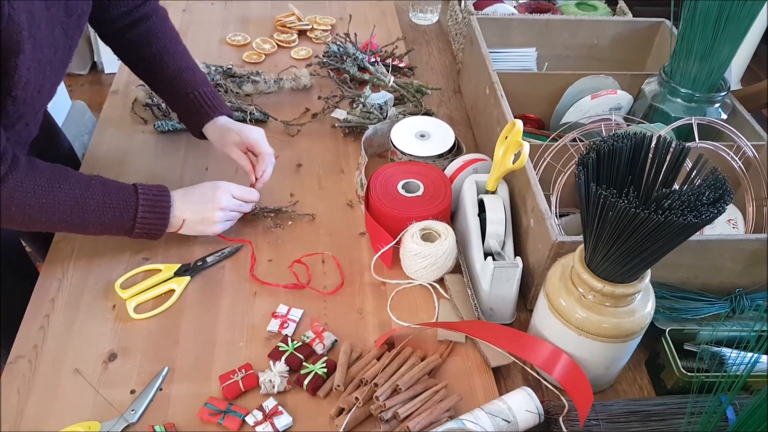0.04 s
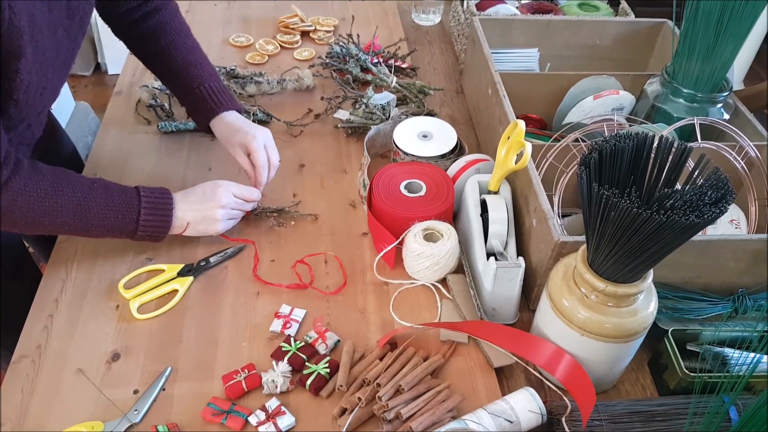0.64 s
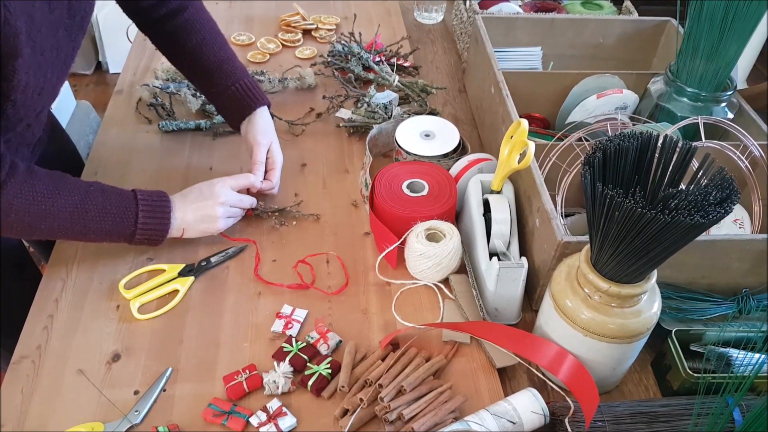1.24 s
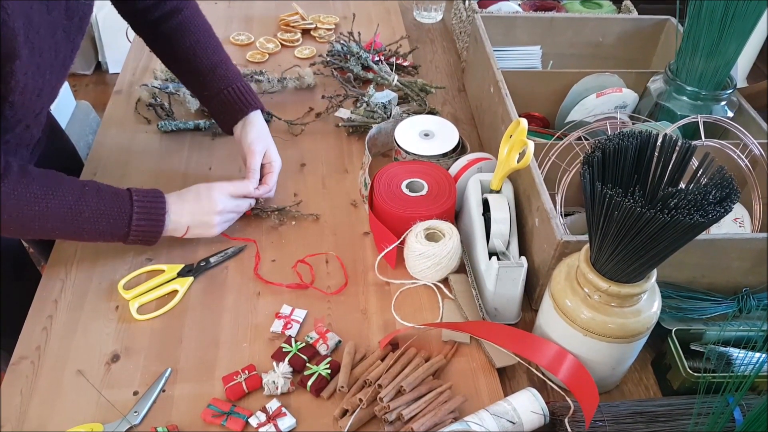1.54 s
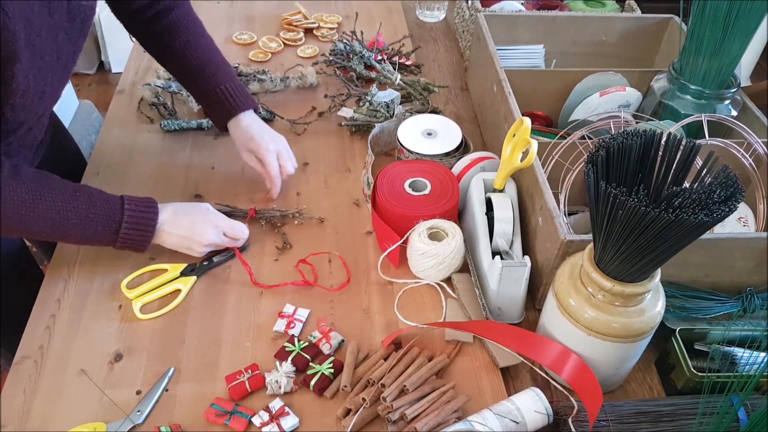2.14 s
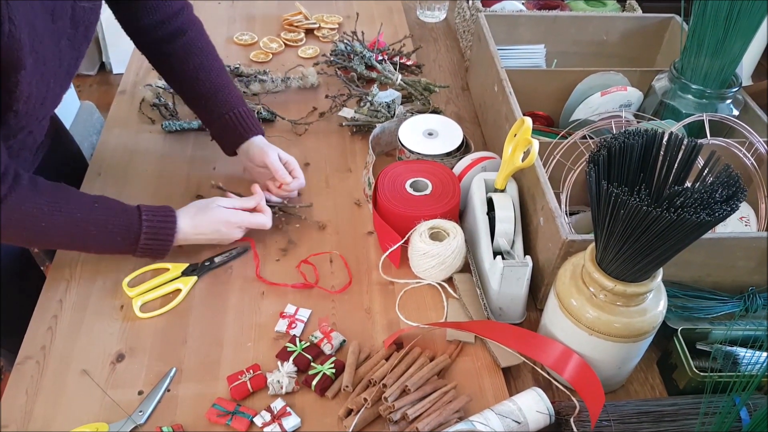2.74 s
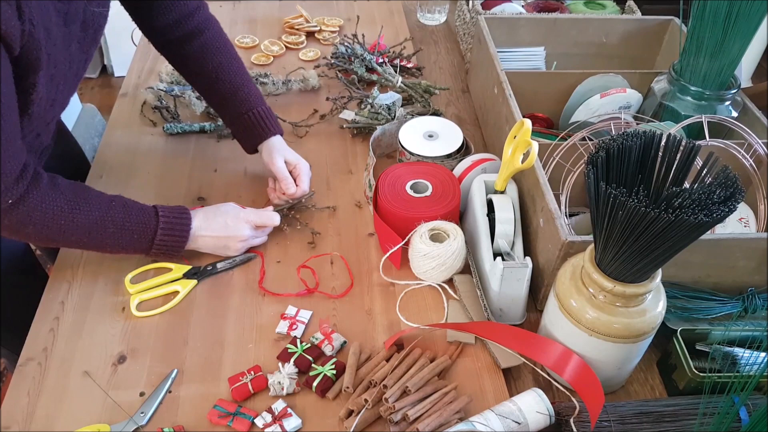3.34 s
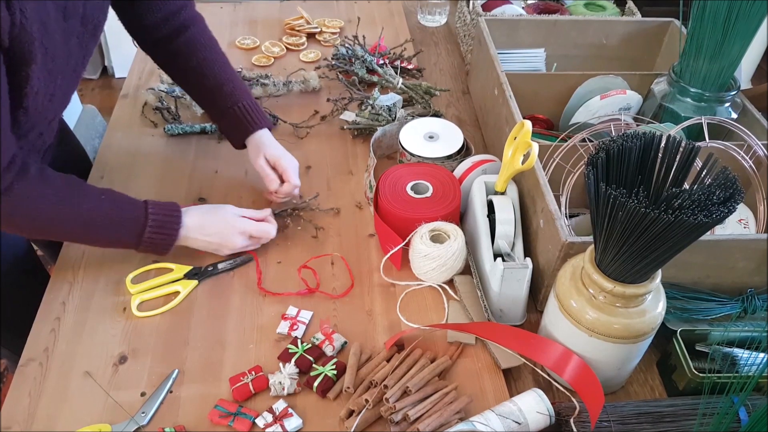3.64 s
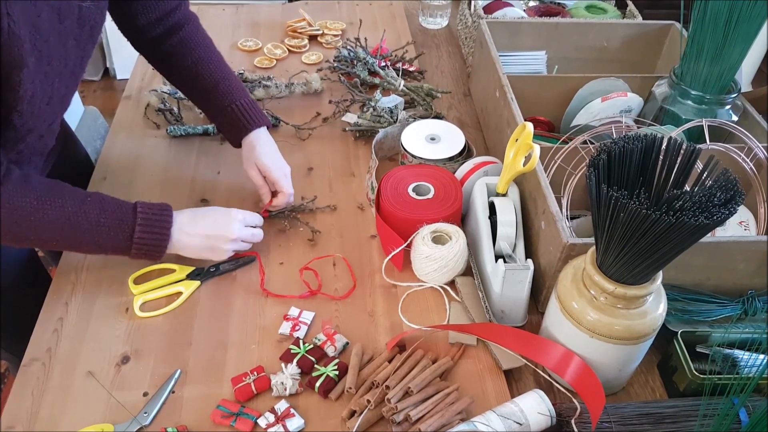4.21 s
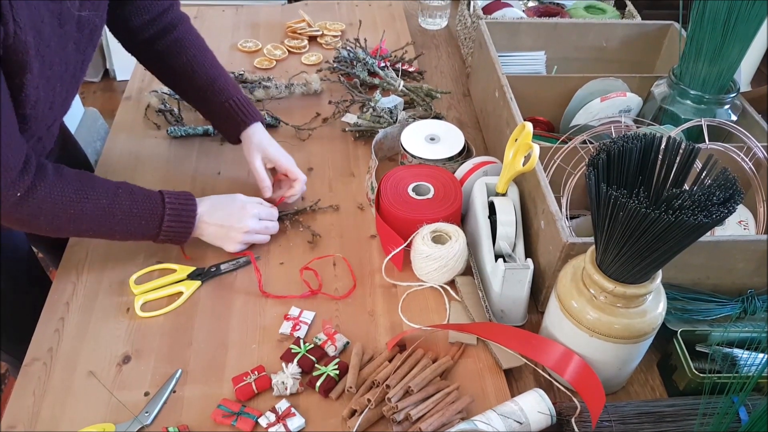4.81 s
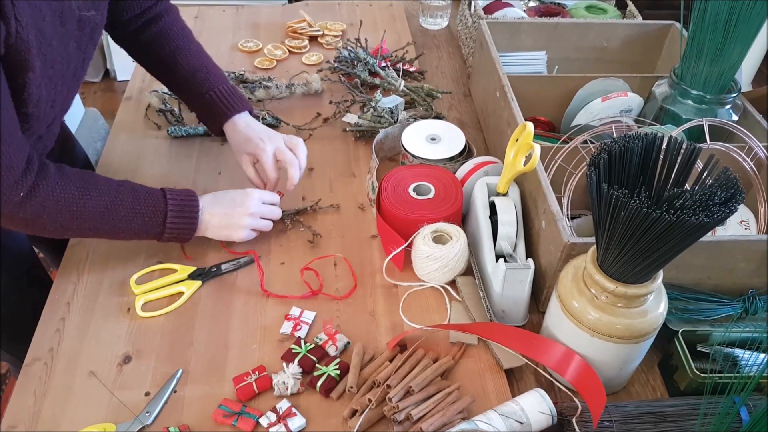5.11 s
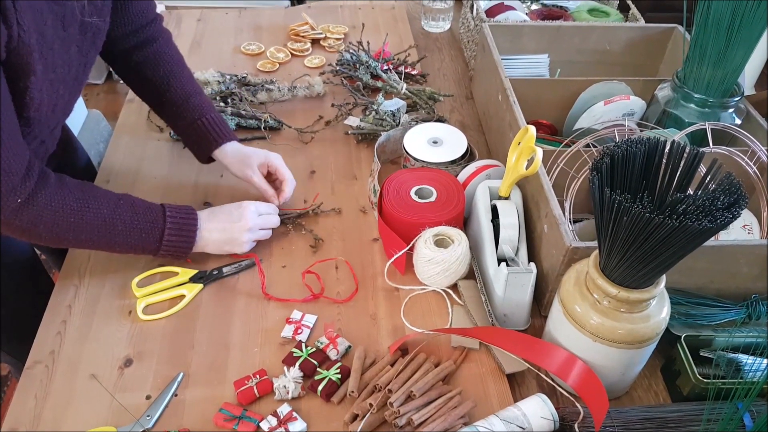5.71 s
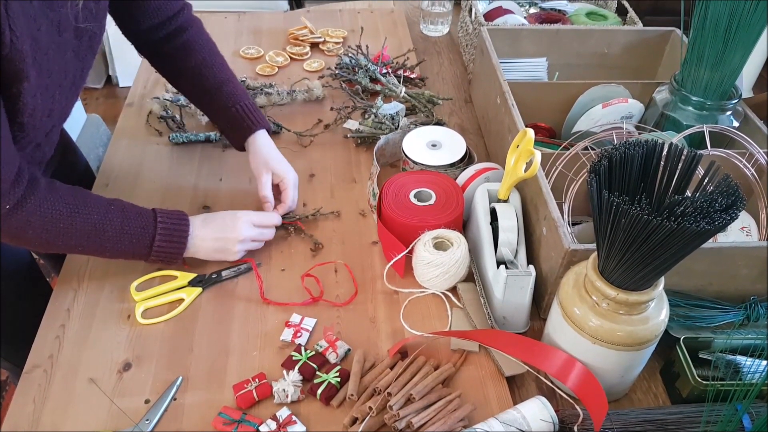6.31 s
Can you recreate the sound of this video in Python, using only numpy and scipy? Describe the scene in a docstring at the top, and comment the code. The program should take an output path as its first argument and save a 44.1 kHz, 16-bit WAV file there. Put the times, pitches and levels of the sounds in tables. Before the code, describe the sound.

In a quiet workroom, hands wind raffia around a bunch of dry twigs, making faint rustles and small, crisp crackles. A little before halfway, something hard is set down on wood a short way off, with a much louder double knock and a brief clatter. Light taps, soft thuds and faint scrapes follow while the twigs crackle on sparsely. The microphone is near the hands, with a low hiss behind.

```python
"""Hands wind wired raffia round a bunch of dry twigs at a wooden table in a quiet workroom. Friction makes the
fibres rustle, and small brittle fractures make the twigs crackle, and now and then a twig taps the table. A
little way off something hard is set down with a double knock that excites the modes of the wood, then shifted
about with light taps and stick-slip scrapes. Underneath lie a far, sinking drone, two soft, low swells of
rumble, a few soft thuds, the murmur of the building and a steady hiss."""
import sys
import numpy as np
from scipy import signal
from scipy.fft import rfft, irfft, next_fast_len
from scipy.io import wavfile
from scipy.ndimage import uniform_filter1d

SR = 44100
rng = np.random.default_rng(int(sys.argv[2]) if len(sys.argv) > 2 else 0)


def transcribe(signal):
    """Save signal, clipped to [-1, 1], as a 16-bit WAV file at the path in sys.argv[1]."""
    frames = np.atleast_2d(signal).T
    limited = np.clip(frames, -1, 1)
    pcm = np.round(limited * 32767).astype(np.int16)
    wavfile.write(sys.argv[1], SR, pcm)


N = 289472
TIME = np.arange(N) / SR


def gain_of(db):
    """Amplitude grows tenfold with every 20 dB."""
    return np.exp(np.asarray(db) * (np.log(10) / 20))


def unit_rms(x):
    """Dividing by the rms gives a signal unit power."""
    return x / np.sqrt(np.mean(x ** 2) + 1e-20)


def read(points, hz):
    """Interpolation of a spectrum on a logarithmic frequency axis."""
    known_hz, value = np.transpose(points)
    return np.interp(np.log(hz + 1), np.log(known_hz + 1), value)


def add(mix, start_s, sound):
    """Superposition: a sound adds linearly to the mix from its start time."""
    part = mix[..., max(round(start_s * SR), 0):][..., :sound.shape[-1]]
    part += sound[..., :part.shape[-1]]


def convolve(x, response):
    """A linear system convolves each channel with its impulse response."""
    return signal.fftconvolve(np.atleast_2d(x), np.atleast_2d(response), axes=1)[:, :N]


def minimum_phase(spectrum):
    """Minimum phase gives the most compact response with this spectrum, here of unit energy."""
    log_gain = np.log(gain_of(read(spectrum, abs(np.fft.fftfreq(4096, 1 / SR)))))
    response = np.fft.ifft(np.exp(signal.hilbert(log_gain).conj())).real[:2048]
    return response / np.linalg.norm(response)


def gestures(rows, rise_s, fall_s):
    """An envelope for rows of start, length and dB: linear attack, hold, then exponential decay."""
    envelope = np.zeros(N)
    for start, length, db in rows:
        t = TIME[:round((length + 10 * fall_s) * SR)]
        decay = np.exp(-np.maximum(t - length, 0) / fall_s)
        add(envelope, start, gain_of(db) * np.minimum(t / rise_s, 1) * decay)
    return envelope


def diffuse_noise(samples):
    """A diffuse field is coherent at two microphones in the bass and independent in the treble."""
    # Likeness of the two channels. Each row: frequency in Hz, coherence from 0 to 1.
    coherence = [(30, .7), (70, .68), (150, .92), (300, .8), (500, .68), (800, .3), (1500, .02),
                 (16000, .02)]
    size = next_fast_len(samples, True)
    spectra = rfft(rng.standard_normal((2, samples)), size)
    alike = read(coherence, np.fft.rfftfreq(size, 1 / SR))
    mid = spectra[0] * np.sqrt((1 + alike) / 2)
    side = spectra[1] * np.sqrt((1 - alike) / 2)
    return irfft(np.array([mid + side, mid - side]), size)[:, :samples]


def coloured_noise(spectrum):
    """Diffuse white noise takes on the spectrum of its filter; the result has unit power."""
    return unit_rms(convolve(diffuse_noise(N), minimum_phase(spectrum)))


def room(x, clutter_db, tail_db, clutter_t60=.1, onset_s=.0014):
    """Reverberation: quick scattering from things on the table, and the room's exponential tail."""
    # Decay of the room. Each row: frequency in Hz, t60 in seconds.
    decay_times = [(130, 0.44), (550, 0.58), (1200, 0.6), (2500, 0.58), (5000, 0.9), (12000, 0.06)]
    # Spectrum of the tail. Each row: frequency in Hz, level in dB.
    colour = [(130, 2), (400, 6), (800, .8), (1300, -3.6), (2000, -2), (3200, -8.5), (5000, -10.5),
              (14000, -12)]
    hz, t, bands = signal.stft(diffuse_noise(SR), SR, nperseg=256)
    bands *= gain_of(read(colour, hz)[:, None] - 60 * t / read(decay_times, hz)[:, None])
    tail = signal.istft(bands, SR, nperseg=256)[1][:, :SR]
    clutter = diffuse_noise(SR) * gain_of(-60 * TIME[:SR] / clutter_t60)
    swell = np.minimum(TIME[:SR] / onset_s, 1) ** 2
    return convolve(x, swell * (gain_of(clutter_db) * clutter + gain_of(tail_db) * tail))


def hiss(level_db=-69.5):
    """Stationary broadband noise comes from the room and the microphones."""
    # Spectrum of the hiss. Each row: frequency in Hz, relative density in dB.
    colour = [(20, 0), (55, -4), (80, -6.5), (115, -4.5), (200, -9), (350, -8.5), (1000, -11.5),
              (2000, -13), (3000, -16.5), (5000, -20.5), (7800, -24), (10000, -25.5), (13000, -19),
              (15800, -22)]
    return gain_of(level_db) * coloured_noise(colour)


def murmur():
    """The building's murmur is low-frequency noise under slow amplitude modulation."""
    # Spectrum of the murmur. Each row: frequency in Hz, relative density in dB.
    colour = [(25, -13.5), (80, -3.5), (125, 0), (190, -6), (300, -7), (600, -14.5), (1600, -17.5),
              (3000, -21.5), (6000, -37), (16000, -44)]
    # Its rise and fall. Each row: time in seconds, level in dB.
    contour = [(0, -67), (.45, -71.5), (.7, -71.5), (1.6, -69.5), (1.9, -66), (2.5, -71.5), (4.0, -71.5),
               (4.5, -76), (6.56, -73)]
    times, db = np.transpose(contour)
    return gain_of(np.interp(TIME, times, db) - .3) * coloured_noise(colour)


def drone(start_hz=60.2, sag_hz_per_s=2.1, lowest_hz=56.3, drift=.012, waver_db=3, rest_db=-95.5):
    """A far drone is a harmonic series on a wavering fundamental that sinks, then settles."""
    # Its swells. Each row: start and length in seconds, fundamental level in dB, overtone level in dB.
    swells = [(-.05, 0.52, -73, -68.5), (0.598, 0.56, -71, -77), (1.8, .2, -75, -82), (2.05, .55, -71, -84),
              (2.7, .55, -76, -87)]
    # Relative levels of the harmonics in dB, from the second upward.
    overtones_db = [-1, -5, -14, -23, -20]
    knots = np.linspace(0, TIME[-1], num=90)
    draws = rng.standard_normal((2 + len(overtones_db), len(knots)))
    waver, wander, *flutters = (np.interp(TIME, knots, row) for row in draws)
    hz = np.maximum(start_hz - sag_hz_per_s * TIME, lowest_hz) * (1 + drift * wander)
    phase = 2 * np.pi * np.cumsum(hz) / SR
    fundamental = gain_of(waver_db * waver) * unit_rms(np.sin(phase))
    overtones = sum(gain_of(db + waver_db * flutter) * np.sin(k * phase)
                    for k, (db, flutter) in enumerate(zip(overtones_db, flutters), 2))
    rest, rise_s, fall_s = gain_of(rest_db), .081, .14
    deep = rest + gestures([(s, length, db) for s, length, db, _ in swells], rise_s, fall_s)
    upper = rest + gestures([(s, length, db) for s, length, _, db in swells], rise_s, fall_s)
    return deep * fundamental + upper * unit_rms(overtones)


def grains(per_s, spread_db=3):
    """Shot noise: tiny impulses of very unequal size arrive at random."""
    size = gain_of(spread_db * np.minimum(rng.exponential(1, N), 4))
    return unit_rms(size * rng.choice([-1, 1], N) * (rng.random(N) < per_s / SR))


def rustle(holding_db=-84.5, clump_db=3):
    """Friction of raffia on twigs sheds fine clicks, in clumps as it catches and lets go."""
    # Pulls of the raffia. Each row: start in seconds, length in seconds, level in dB.
    pulls = [(0.144, 0.036, -75.5), (0.342, 0.027, -73.5), (.98, 0.093, -71), (1.135, 0.065, -73),
             (1.342, 0.055, -71), (1.788, .1, -66), (1.915, .04, -71.5), (1.995, 0.11, -70),
             (2.24, .14, -80), (2.529, 0.44, -76), (2.985, 0.086, -71.5), (3.716, 0.092, -71),
             (3.961, 0.11, -80), (4.275, 0.031, -70), (4.86, 0.25, -79.5), (5.16, 0.061, -75.5),
             (5.507, 0.028, -76), (6.17, 0.047, -77.5)]
    fibres = np.array([grains(per_s=6000), grains(per_s=6000)])
    catching = gain_of(clump_db * unit_rms(uniform_filter1d(rng.standard_normal(N), size=150)))
    rubbing = gain_of(holding_db) + gestures(pulls, rise_s=.02, fall_s=.035)
    return rubbing * catching * fibres


def crackle(decay_s, body_db, swell_s=.0018, snap_s=.0011, body_hz=2500, crisp_hz=4200):
    """A crackle is a transient: faint clicks swell briefly into a snap, 10 ms in, then die away."""
    t = TIME[:SR // 16] - .01
    shape = (2, len(t))
    clicks = rng.standard_normal(shape) * (rng.random(shape) < 7000 / SR)  # 7000 a second
    clicks *= gain_of(-12) * np.exp(-abs(t) / np.where(t < 0, swell_s, decay_s))
    snap = rng.standard_normal(shape) * (t >= 0) * np.exp(-abs(t) / snap_s)
    snap /= np.linalg.norm(snap, axis=1, keepdims=True)
    # thick twigs add body, fine fibres only crisp treble
    return convolve(snap + clicks, minimum_phase([(body_hz, body_db), (crisp_hz, 0)]))


def twigs(stray_count=24, stray_db=-53.5, stray_spread_db=3, right_db=2):
    """Source and filter: rustle, loud crackles and faint chance ones share the colour of the twigs."""
    # The louder crackles. Each row: time in seconds, level in dB, decay time of the splintering
    # in seconds, woody body in dB.
    crackles = [(0.095, -42, .002, -3), (0.9225, -45, .012, -6), (0.9875, -34.5, .004, -3),
                (1.0545, -39, .005, 5), (1.1205, -49, .001, -3), (1.1428, -33.5, .005, 3),
                (1.1558, -36.5, .003, -3), (1.1605, -34, .01, -4), (1.2555, -48, .001, -8),
                (1.3588, -37, .002, -10), (1.3646, -35.5, .003, -7), (1.3712, -30.5, .003, -5),
                (1.385, -45, .008, 0), (1.572, -48, .002, -4), (1.640, -45, .002, -5),
                (1.701, -48, .004, -5), (1.7865, -48, .001, -6), (1.799, -46, .008, -8),
                (1.8105, -42.5, .002, 0), (2.0125, -45, .002, -8), (2.0232, -42.5, .002, -4),
                (2.0515, -42, .003, -5), (2.083, -48, .002, 0), (2.1015, -43.5, .002, -9),
                (2.1195, -46, .002, 8), (2.244, -49, .001, -6), (2.562, -40.5, .0014, -4),
                (2.9803, -42, .006, -5), (3.462, -42, .0015, 0), (3.9053, -40, .001, -4),
                (4.2125, -44, .007, -6), (4.3252, -44, .001, -8), (4.3696, -38.5, .002, -8),
                (4.392, -42, .003, -7), (4.8782, -38, .005, -2), (4.9706, -42.5, .002, -4),
                (4.982, -45, .002, -5), (5.855, -47, .004, -3)]
    # Spectrum of the twigs. Each row: frequency in Hz, relative gain in dB.
    colour = [(100, -17.5), (500, 3.5), (1500, 1.5), (3000, 0), (5000, -2), (6500, 0.5), (7900, 3),
              (9700, -2), (12000, 1), (16000, 0.5)]
    source = rustle()
    strays = [(when * TIME[-1], stray_db + stray_spread_db * (2 * size - 1), .0024, -3)
              for when, size in rng.random((stray_count, 2))]
    for s, db, decay_s, body_db in crackles + strays:
        add(source, s - .01, gain_of(db) * crackle(decay_s, body_db))
    direct = gain_of(-.8) * convolve(source, minimum_phase(colour))
    return direct * gain_of([[0], [right_db]]) + room(direct, clutter_db=-33, tail_db=-35.5)


def low_swells():
    """Amplitude-modulated noise makes two soft, low swells of rumble over the far drone."""
    # The swells. Each row: start in seconds, length in seconds, level in dB.
    swells = [(.27, .075, -69), (.42, .08, -71.5)]
    # Their spectrum. Each row: frequency in Hz, relative density in dB.
    colour = [(50, -25), (115, -0.5), (200, -2), (380, -5.5), (700, -22), (2000, -19), (8000, -47)]
    return gestures(swells, rise_s=.027, fall_s=.14) * coloured_noise(colour)


def ring(modes):
    """A struck body vibrates in damped modes, one a row; neighbours start in opposite phase."""
    hz, db, t60 = np.transpose(modes)[:, :, None]
    t = TIME[:SR // 5]
    sign = (-1) ** np.arange(len(modes))[:, None]
    return sign * gain_of(db - 60 * t / t60) * np.cos(2 * np.pi * hz * t)


def soften(x, cutoff_hz):
    """A contact of finite duration acts as a low-pass filter; the result has peak 1."""
    softened = signal.sosfilt(signal.butter(4, cutoff_hz, fs=SR, output="sos"), x)
    return softened / abs(softened).max()


def thuds():
    """Soft blows excite only low modes, which linger as reverberation."""
    # The blows. Each row: start in seconds, level in dB, weight of the lowest mode in dB.
    blows = [(1.3044, -53.5, -0.5), (1.887, -56.5, -10), (1.922, -59, -10), (2.789, -41, 2),
             (2.868, -51, 0), (3.044, -59, -8), (4.866, -55, -14), (5.0537, -44, 4.5), (6.43, -52.5, -12)]
    # Modes of a thud. Each row: frequency in Hz, level in dB, t60 in seconds.
    low_modes = [(138, -8, 0.17), (188, -13, 0.14), (249.7, -1.5, 0.07), (306, -3.5, 0.055),
                 (550, -9, 0.078)]
    direct, modes = np.zeros(N), ring(low_modes)
    for s, db, weight_db in blows:
        boom = gain_of(weight_db) * modes[0] + modes[1:].sum(0)
        add(direct, s, gain_of(db) * soften(boom, cutoff_hz=480))
    return gain_of(2) * direct + room(direct, clutter_db=-35, tail_db=-40.5)


def right_path(x, turn_hz=2080, width_hz=900):
    """The path round to the right microphone is an all-pass turn of phase with a treble lift."""
    # The lift. Each row: frequency in Hz, relative gain in dB.
    colour = [(300, 0), (1200, 1), (2200, 2.5), (4000, 3)]
    band = signal.lfilter(*signal.iirpeak(turn_hz, turn_hz / width_hz, fs=SR), x)
    return convolve(x - 2 * band, minimum_phase(colour))[0]


def early_sound(x, right_lag_s=.00003, right_db=2.7):
    """The direct wave reaches each microphone first, then its reflections from nearby surfaces."""
    # The reflections. Each row: left delay in seconds, right delay in seconds, level in dB.
    echoes = [(.0036, .00295, -6.5), (.0062, .0092, -15)]
    pair, bright = np.zeros((2, N)), right_path(x)
    for left_s, right_s, db in [(0, right_lag_s, 0)] + echoes:
        add(pair[0], left_s, gain_of(db) * x)
        add(pair[1], right_s, gain_of(db + right_db) * bright)
    return pair


def knocks(low_hz=600, spot_t60=.024, heavy_db=-17):
    """Impact excites the modes of wood: a harder contact the higher ones, a heavier one the lower."""
    # Knocks and taps on the wood; the first two rows are twigs tapping the table. Each row: start in # seconds,
    # level in dB, brightness in Hz, weight of the low modes in dB, pitch of the struck spot in Hz, # level of
    # its ring in dB.
    strikes = [(2.108, -57.5, 2200, -2, 1500, -5), (2.201, -57, 2380, 15, 1590, -5),
               (2.6342, -14.8, 2100, 1, 1330, -10), (2.6408, -23, 1500, -2, 1100, -5),
               (2.6943, -14.8, 3700, 2, 1500, -3.5), (2.7135, -35, 3000, -5, 1350, -1),
               (2.7313, -25, 2400, 0, 1200, -4), (2.7475, -31, 2300, 0, 1310, -5),
               (2.7585, -35, 2700, -3, 1560, -5), (2.801, -37, 1900, -3, 1100, -6),
               (3.0043, -40, 1900, -1, 900, -7), (3.1328, -40.5, 2000, 3, 1560, -10),
               (3.461, -53, 5000, -15.5, 3290, -3.5), (3.6164, -54, 1130, -21, 990, -4),
               (3.757, -54, 2600, 4, 1620, -4), (3.8569, -51.5, 1200, 1, 980, 0),
               (3.8767, -47, 2300, 6, 1010, -2.5), (3.9722, -50, 2290, 11, 990, -5.5),
               (4.0694, -57, 2320, -23, 1600, -1), (4.0931, -52, 1920, 4, 920, -10),
               (4.155, -53, 2600, -2, 2150, -1), (4.236, -61, 3000, -10, 2170, 4),
               (4.2824, -51.5, 2800, 3, 1110, -6), (4.3589, -48, 2800, 2, 1420, -8),
               (4.7322, -44, 3300, -3, 1374, -8), (4.8473, -52, 2394, 6, 1400, -8),
               (4.8625, -46.5, 1900, 18, 850, -5.5), (4.878, -43, 3400, 10, 2060, -6),
               (4.905, -55, 2000, 12, 900, -6), (5.0525, -56, 1900, 13.5, 706, -11),
               (5.329, -54.5, 2490, -7.5, 904, -7.5), (5.594, -53.5, 3300, -12.5, 1700, -9)]
    # Modes of the wood. Each row: frequency in Hz, level in dB, t60 in seconds.
    wood = [(165, -25, .08), (265, -27, .048), (390, -24.5, .05), (560, -17.5, .033), (675, -17.5, .045),
            (848, -9.5, .021), (1005, -6.5, .017), (1290, -3, .0167), (1450, 1.4, .0108),
            (1594, -2.9, .013), (1950, -4.8, .0118), (2240, -2.2, .008), (2790, -5, .008),
            (3259, -4.9, .006), (4050, -8.5, .003)]
    # Spectrum of the contact's sharp click. Each row: frequency in Hz, relative density in dB.
    click_colour = [(100, -9), (3000, -2), (5500, 3), (7900, -1.5), (9800, -13.5), (12000, -3), (16000, -5)]
    direct, to_room = np.zeros((2, N))
    modes, click = ring(wood), minimum_phase(click_colour)
    lowness = 1 / (1 + (np.array(wood)[:, 0] / low_hz) ** 4)
    for s, db, bright_hz, weight_db, spot_hz, spot_db in strikes:
        spot = ring([(spot_hz, spot_db, spot_t60)])[0]
        body = soften(gain_of(weight_db * lowness) @ modes - spot, bright_hz)
        click_db = -28.5 + 20.5 * np.log2(bright_hz / 1964)  # a brighter contact clicks more
        body[:len(click)] += gain_of(click_db) * click
        add(direct, s, gain_of(db) * body)
        # heavy blows shake the whole board and so fill the room more
        add(to_room, s, gain_of(db + .1 * (db - heavy_db)) * body)
    return gain_of(-.7) * early_sound(direct) + room(to_room, clutter_db=-29, tail_db=-33.5)


def resonate(x, hz, width_hz):
    """A resonance follows the curve hz; its double pole gives it steep flanks."""
    carrier = np.exp(2j * np.pi * np.cumsum(hz) / SR)
    pole = np.exp(-np.pi * width_hz / SR)
    return (carrier * signal.lfilter([(1 - pole) ** 2], [1, -2 * pole, pole ** 2], x / carrier)).real


def scrapes(drift=.03):
    """Stick-slip friction of the hard thing on wood makes a broad rasp and a creak of wandering pitch."""
    # The shoves. Each row: start and length in seconds, level in dB, the rasp's share of the power
    # from 0 to 1, pitch of the creak in Hz.
    shoves = [(3.55, 0.15, -69.5, .45, 985), (3.705, 0.081, -73, 0.9, 1050),
              (3.913, 0.044, -68.5, 0.85, 1010), (4.121, 0.038, -63.5, 0.94, 1050),
              (4.24, 0.087, -78, 0.7, 2210), (4.653, 0.026, -71.5, 0.7, 1260), (4.70, 0.022, -73, .6, 2080),
              (6.18, 0.051, -78, .8, 1000), (6.445, 0.042, -74, 0.4, 900)]
    # Spectrum of the rasp. Each row: frequency in Hz, relative density in dB.
    colour = [(200, -20), (600, -6), (1000, 0.5), (1600, 2), (2400, -5), (3500, -9), (6000, -23),
              (16000, -40)]
    slips = grains(per_s=1200)
    rasp = unit_rms(convolve(slips, minimum_phase(colour)))
    wander = 1 + drift * unit_rms(uniform_filter1d(rng.standard_normal(N), size=2500))
    direct = np.zeros((1, N))
    for *shove, share, hz in shoves:
        creak = unit_rms(resonate(slips, hz * wander, width_hz=170))
        envelope = gestures([shove], rise_s=.011, fall_s=.018)
        direct += envelope * (np.sqrt(1 - share) * creak + np.sqrt(share) * rasp)
    return gain_of(-2.5) * direct + room(direct, clutter_db=-26.5, tail_db=-31.5)


def scene():
    """The pressures of all sources superpose at the two microphones."""
    return hiss() + murmur() + drone() + knocks() + thuds() + scrapes() + twigs() + low_swells()


def record(dry):
    """A linear-phase low-pass filter limits the bandwidth."""
    edge_hz = 16050
    low_pass = signal.firwin(511, edge_hz, window=("kaiser", 8), fs=SR)
    return signal.oaconvolve(dry, low_pass[None], "same")


dry = scene()
out = record(dry)
transcribe(out)
```